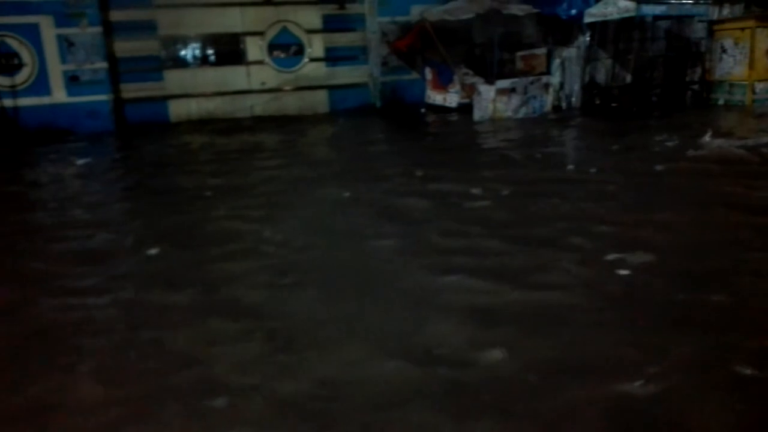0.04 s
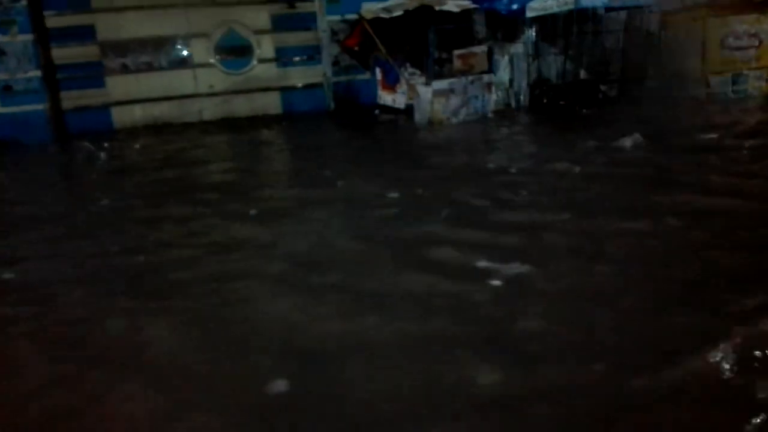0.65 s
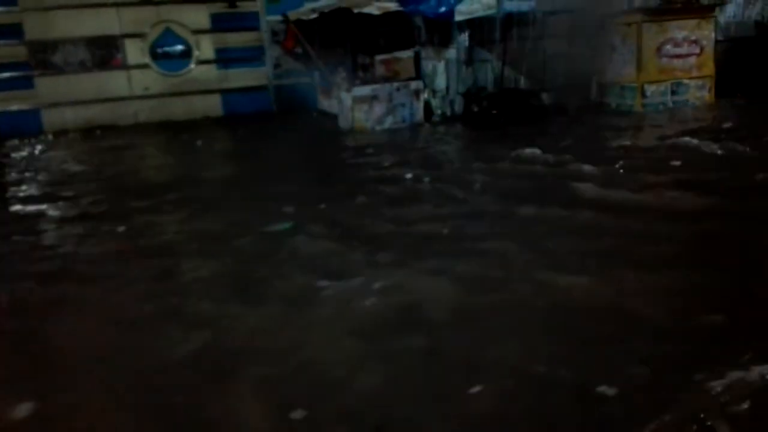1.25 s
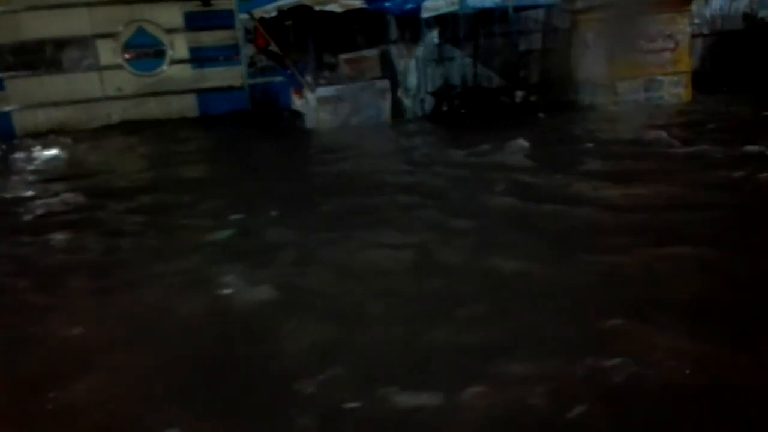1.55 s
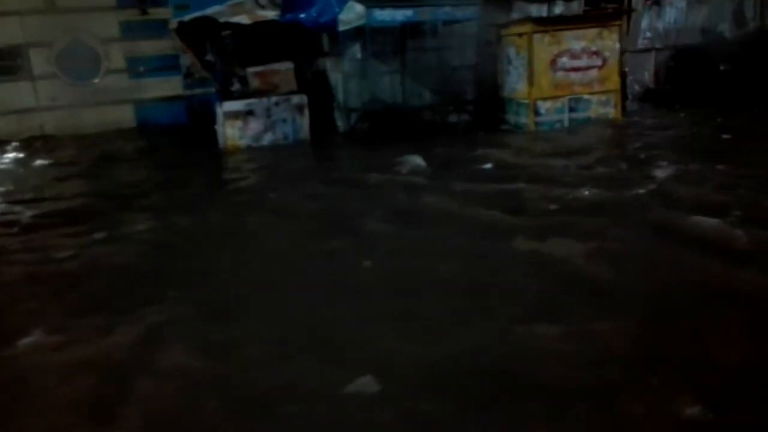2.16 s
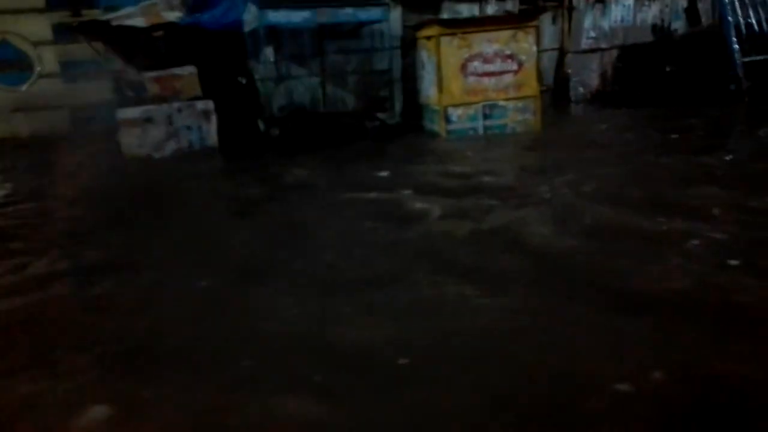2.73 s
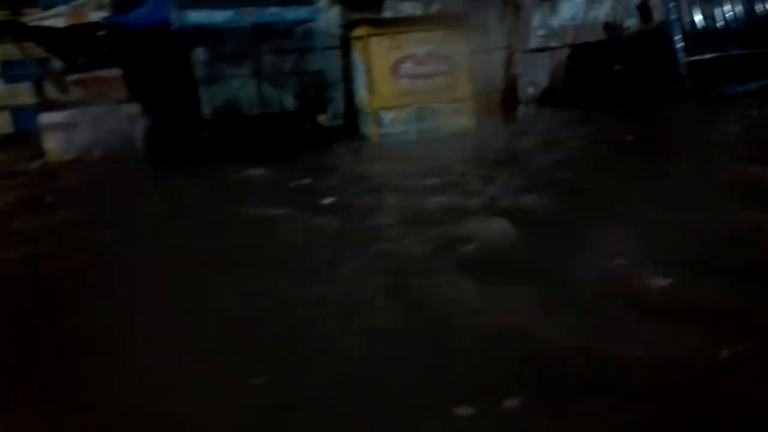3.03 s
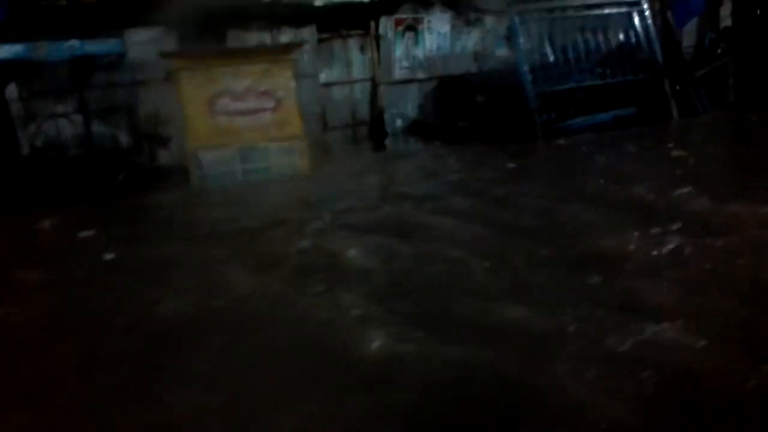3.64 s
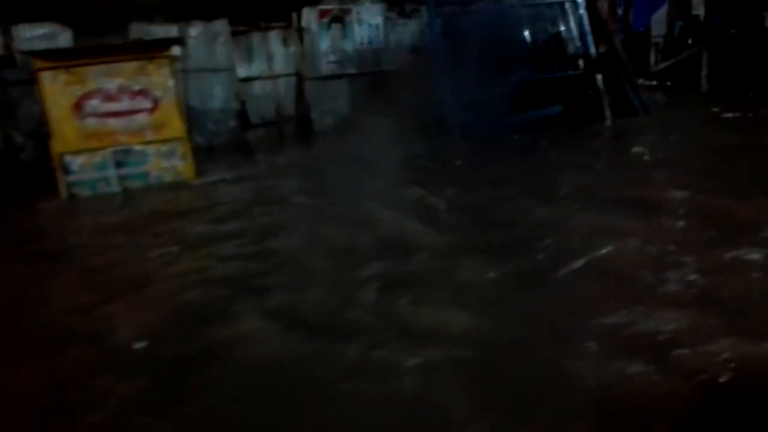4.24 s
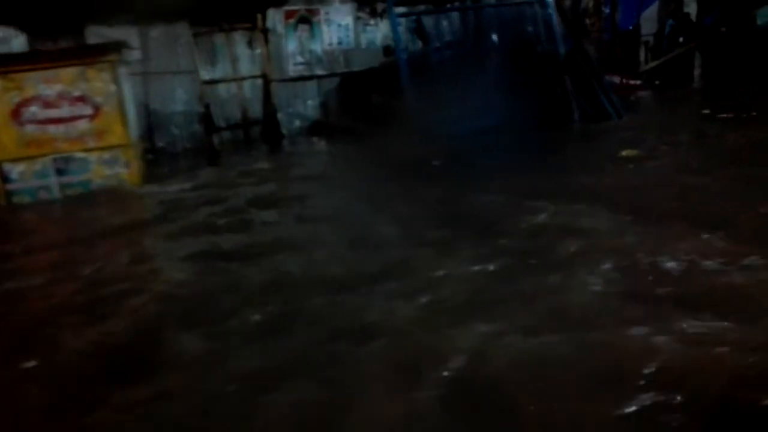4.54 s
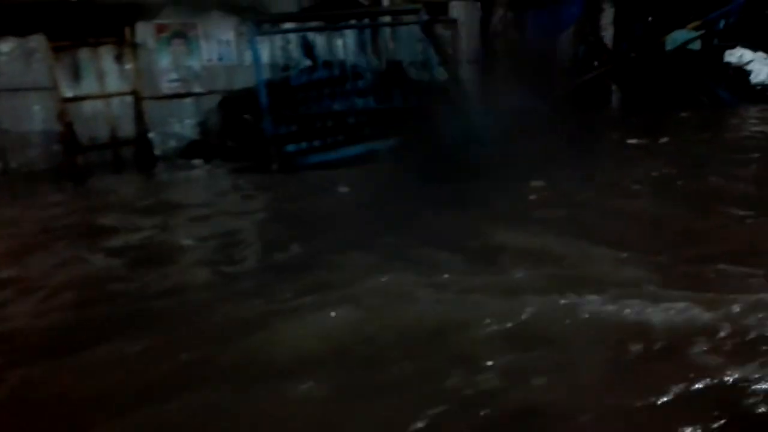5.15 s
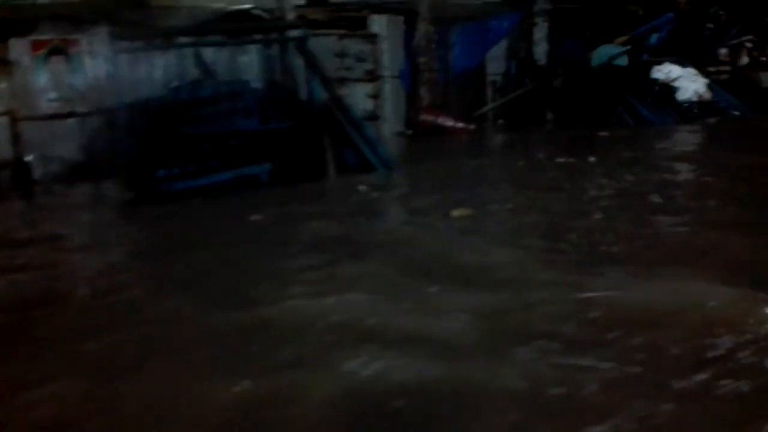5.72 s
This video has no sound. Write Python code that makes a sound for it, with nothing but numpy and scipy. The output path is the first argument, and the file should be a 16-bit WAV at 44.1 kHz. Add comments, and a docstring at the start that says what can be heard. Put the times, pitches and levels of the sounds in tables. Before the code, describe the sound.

Water swishes and splashes as a small vehicle wades through it, its engine chugging and a dry joint chirping.

```python
"""The engine of a small vehicle thuds about 32 times a second as it wades slowly through a flooded street.
Heard from on board, it runs over a low hum and is twice revved a little, with a thin metal whine.
Its shaking makes a dry joint chirp and a loose panel knock. The wave pushed up in front churns and
fizzes, with slaps of water, and trapped air rings as drips, a plop and a few deep glugs.
Very high up there are brief puffs of hiss, faint ticks and one short, broken squeal."""
import sys
import numpy as np
from scipy import signal
from scipy.fft import rfft, irfft
from scipy.io import wavfile
from scipy.ndimage import uniform_filter1d

SR = 44100
rng = np.random.default_rng(int(sys.argv[2]) if len(sys.argv) > 2 else 0)


def wav_out(sig):
    """Save sig, one row per channel (or a flat mono array), as 16-bit PCM at SR to the path in sys.argv[1]."""
    wavfile.write(sys.argv[1], SR, np.round(np.clip(np.atleast_2d(sig).T, -1, 1) * 32767).astype(np.int16))


N = 254898
TIME = np.arange(N) / SR

# how fast the engine fires: (time [s], rate [firings per second])
FIRING_RATE = [(0.0, 34), (0.18, 31.5), (0.5, 31), (1.05, 31), (1.3, 32.5), (1.42, 32.5), (1.7, 35.5),
               (2.0, 35), (2.2, 35.5), (2.5, 33), (2.85, 32.5), (3.35, 31.5), (3.6, 32), (4.0, 31),
               (4.4, 31), (4.7, 32), (4.83, 32.5), (4.97, 34), (5.08, 33.5), (5.27, 35.5), (5.5, 32),
               (5.78, 31.5)]
# how strong the thud is: (time [s], relative level [dB])
THUD_LEVELS = [(0.0, -24), (0.03, -23.5), (0.14, -17), (0.2, -14), (0.245, -21), (0.29, -14.5), (0.4, -16),
               (0.55, -18.5), (0.85, -15.5), (0.98, -16.5), (1.05, -19.5), (1.6, -19), (1.67, -15),
               (1.82, -19), (2.24, -18.5), (2.41, -23), (2.7, -17.5), (2.8, -19.5), (3.1, -17.5),
               (3.41, -17), (3.6, -19.5), (3.77, -16), (3.85, -18), (4.02, -14.5), (4.12, -18), (4.35, -19),
               (4.51, -17.5), (4.58, -17.5), (5.2, -17), (5.39, -19), (5.59, -17), (5.78, -18.5)]
# the higher tones of the thud: (multiple of the firing rate, relative level [dB])
OVERTONES = [(2, -18.5), (3, -20), (4, -28.5), (5, -25.5), (6, -28.5), (7, -29.5), (8, -29), (9, -38),
             (10, -34.5)]
# under the floor: (time [s], relative level of body shaking [dB], of churning water [dB])
UNDERSIDE_LEVELS = [(0.0, -29.5, -36.5), (0.87, -32, -36), (1.12, -30.5, -38.5), (1.95, -30.5, -36.5),
                    (2.35, -30, -40), (2.7, -30, -40), (3.11, -31.5, -35.5), (3.7, -31, -38.5),
                    (4.4, -33.5, -42), (4.7, -29, -35.5), (5.15, -31, -36.5), (5.45, -31.5, -37.5),
                    (5.62, -28, -32), (5.78, -30.5, -36)]
# tone colour of the shaking body: (frequency [Hz], relative level [dB])
RUMBLE_SPECTRUM = [(12, -23), (19.5, 0), (30, 10), (45, -5), (53, 3.5), (65, -1.5), (84, -3.5), (100, -5),
                   (125, -9.5), (180, -16), (400, -63)]
# two low hums: (upper pitch [Hz], lower pitch [Hz])
HUM_PITCHES = [121.45, 84.7]
# how strong they are: (time [s], upper level [dB], lower level [dB])
HUM_LEVELS = [(0, -36.5, -37.5), (1.5, -37, -38.5), (1.8, -39.5, -37), (2.1, -36, -35), (2.5, -37.5, -39.5),
              (3.2, -41, -42), (4.1, -41, -55), (4.4, -47, -46), (5.78, -42, -47)]
# how the whine swells: (time [s], relative level [dB])
WHINE_LEVELS = [(0.0, -12), (1.44, -14), (1.5, -3), (1.75, -3.5), (1.95, 0), (2.25, 0), (2.6, -1.5),
                (2.7, -4.5), (3.1, -7), (3.5, -11), (4.2, -9), (5.0, -6), (5.3, -4), (5.78, -10)]
# its raspy overtones: (pitch [Hz], width [Hz], relative level [dB], swell factor, flutter depth)
WHINE_BANDS = [(7570, 360, -64.5, 1.05, 0.6), (11360, 280, -72.5, 1.6, 0.7)]
# the wave in front: (time [s], relative level of slosh [dB], of spray [dB], of fizz [dB])
WAVE_LEVELS = [(0.0, -43.5, -49, -61.5), (0.39, -44, -49, -63.5), (0.76, -45, -49.5, -62.5),
               (1.0, -45, -51.5, -63), (1.14, -48, -50.5, -64), (1.3, -43, -50, -59.5),
               (1.48, -46, -50.5, -61), (1.7, -45.5, -49, -58.5), (2.11, -46.5, -49.5, -58.5),
               (2.35, -45, -48.5, -61), (2.77, -47.5, -51, -61), (3.57, -43.5, -48.5, -61.5),
               (3.93, -45.5, -49.5, -60.5), (4.47, -43, -48.5, -60), (5.01, -44, -47.5, -58.5),
               (5.54, -43, -48.5, -58), (5.78, -42.5, -47.5, -61.5)]
# tone colours of the wave's four layers, low to high: (frequency [Hz], relative level [dB])
CHURN_SPECTRUM = [(70, -18), (140, -4), (205, 3), (260, -4), (320, -7), (370, -13), (550, -29.5),
                  (1200, -60)]
SLOSH_SPECTRUM = [(200, -6), (380, 2.5), (500, 2.5), (620, 1), (800, 0), (1000, -5), (1250, -2),
                  (1540, -2.5), (1850, -8), (2600, -9.5), (5000, -75)]
SPRAY_SPECTRUM = [(900, -2.5), (1800, 3.5), (2300, -2), (3200, 2.5), (3900, -4), (4500, -6.5), (5000, -9),
                  (6500, -17), (9000, -25.5)]
FIZZ_SPECTRUM = [(3000, -6.5), (5800, 7), (7000, 3.5), (8200, 2.5), (9500, -0.5), (11000, -2.5),
                 (12500, -14), (14500, -21)]
# clear chirps of the joint: (time [s], level [dB], brightness [dB])
LOUD_CHIRPS = [(0.109, -41.5, -12), (0.146, -41, -6), (0.238, -40.5, -9), (0.272, -43, -10),
               (0.371, -49, -22), (0.397, -44, -10), (0.401, -40.5, -10), (0.463, -42.5, -12),
               (0.5913, -40.5, -4), (0.624, -50, -16), (0.685, -46, -13), (0.720, -53, -11),
               (0.809, -44, -6), (0.853, -46.5, -1.5), (1.299, -45, -10), (1.355, -47, -14),
               (1.478, -48, -10), (1.514, -43, -5), (1.690, -41.5, -8), (1.777, -44, -13), (1.834, -49, -4),
               (2.090, -44, -10), (2.549, -38.5, -11), (2.912, -40.5, -9), (3.22, -42, -7),
               (3.255, -43, -9), (3.319, -48, -18), (3.536, -44.5, -15), (4.176, -43.5, -13),
               (4.237, -47.5, -16), (4.271, -46.5, -8), (4.332, -44, -10), (4.427, -48, -16),
               (4.460, -40, -8), (4.527, -46, -8), (4.619, -38.5, -12), (4.654, -47, -1), (4.712, -44, -13),
               (4.747, -44.5, -3), (4.809, -48, -15), (4.840, -38, -9), (4.904, -44, -10), (4.937, -41, -9),
               (4.962, -43, -2), (4.995, -39.5, -10), (5.028, -42, -13), (5.062, -43, -7),
               (5.085, -47, -13), (5.116, -39.5, -9), (5.152, -42, -11), (5.178, -43, -6),
               (5.201, -44, -14), (5.587, -43, -5), (5.620, -44.5, -13), (5.681, -43, -8),
               (5.713, -45.5, -11), (5.745, -44.5, -5)]
# spells of softer chirping: (start [s], end [s], level [dB])
CHIRP_SPELLS = [(.2, .76, -57), (1.25, 1.85, -53), (2.3, 2.56, -53.5), (2.9, 3.0, -48), (3.2, 3.56, -54),
                (4.2, 5.22, -56), (5.45, 5.8, -50.5)]
# where the joint rings: (pitch [Hz], width [Hz], relative level [dB])
JOINT_BANDS = [(4510, 490, 4), (6030, 190, 2), (6900, 86, 1), (8090, 960, 1.5), (9150, 770, -8),
               (10040, 820, -4), (12200, 1800, -3.5)]
# slaps of water: (time [s], level [dB], pitch [Hz], pitch spread [octaves], length [s])
WATER_SLAPS = [(0.188, -39.5, 590, 1.4, 0.11), (0.2, -45.5, 2900, 0.62, 0.037),
               (0.255, -42.5, 1510, 0.16, 0.034), (0.301, -41, 2500, 1.3, 0.0088),
               (0.619, -45, 1236, 0.023, 0.11), (0.76, -43.5, 1340, 0.31, 0.085),
               (0.814, -39, 1410, 0.11, 0.018), (0.855, -43, 1420, 0.25, 0.032),
               (1.617, -47, 2270, 0.61, 0.16), (2.247, -39.5, 594, 0.11, 0.026),
               (3.572, -43, 1500, 0.093, 0.072), (3.577, -41, 720, 0.85, 0.046),
               (3.708, -44.5, 587, 0.12, .03), (4.132, -45, 2270, 0.099, 0.034),
               (4.242, -44, 422, 0.42, 0.2), (4.651, -35, 1060, 0.92, 0.03),
               (4.681, -45.5, 400, 0.35, 0.16), (5.217, -34.5, 1640, 0.87, 0.031),
               (5.565, -35, 1490, 0.11, 0.02), (5.676, -40, 1010, 0.76, 0.038),
               (5.721, -38, 1440, 0.16, 0.011)]
# brief puffs of high hiss: (time [s], level [dB])
HISS_PUFFS = [(0.218, -59), (1.24, -59), (1.925, -59), (2.27, -52.5), (2.777, -55), (3.05, -58),
              (5.335, -55)]
# large air pockets: (time [s], peak level [dB], pitch [Hz], time to fade by 60 dB [s])
AIR_POCKETS = [(0.295, -20, 222, 0.064), (5.045, -21, 214, 0.095), (5.294, -16.5, 275, 0.069),
               (5.339, -23.5, 305, 0.13), (5.414, -27.5, 289, 0.11)]
# single falling drops: (time [s], relative level [dB], pitch [Hz])
DROPS = [(0.395, -38, 2930), (1.149, -42, 2400), (1.777, -38, 2370), (1.835, -39, 2370), (2.274, -39, 2250),
         (2.281, -39, 2960), (3.219, -39, 3020), (3.256, -38, 2960), (3.377, -39, 2190), (4.064, -40, 3240),
         (4.294, -40, 973), (4.372, -36, 1490), (4.753, -36, 2900)]
# one small air pocket: (time [s], level [dB], pitch [Hz], half length [s])
SMALL_POCKET = (0.8168, -28.5, 1390, 0.0028)
# knocks of the panel: (time [s], relative level [dB], treble lift [dB per octave])
PANEL_KNOCKS = [(2.4295, -31, 2.5), (2.4889, -22.5, 3), (2.588, -28.5, 1), (3.0046, -26.5, 0),
                (3.1544, -34, -2), (3.5678, -26, 1), (3.677, -26, 0), (3.7268, -23.5, -1.5),
                (3.7704, -29.5, 2)]
# the panel's own tones: (pitch [Hz], relative level [dB], time to fade by 60 dB [s])
PANEL_TONES = [(1490, -2.5, 0.024), (1770, -8.5, 0.011), (2360, -1, 0.011), (2910, 3.5, 0.0093),
               (3500, -11, 0.008), (3840, -3, 0.013), (4120, -7.5, 0.012)]
# strokes of the squeal: (time [s], length [s], start pitch [Hz], end pitch [Hz], level [dB])
SQUEAL_STROKES = [(4.15, 0.045, 8450, 8900, -63.5), (4.195, 0.035, 8950, 9350, -67),
                  (4.232, 0.047, 9500, 10250, -62), (4.303, 0.045, 10800, 10980, -62.5),
                  (4.35, 0.044, 11020, 11250, -65.5), (4.4, 0.035, 11600, 11600, -67),
                  (4.435, 0.05, 11500, 10800, -70)]


def amp(db):
    """Turns decibels into a number to multiply by."""
    return 10 ** (np.asarray(db) / 20)


def unit(x):
    """Scales a signal to an average strength (rms) of 1."""
    return x / np.sqrt(np.mean(x ** 2) + 1e-20)


def curve(rows):
    """Joins a table's points with straight lines: one curve for each column after the time."""
    times, *columns = np.transpose(rows)
    return [np.interp(TIME, times, column) for column in columns]


def colour(x, spectrum):
    """Gives a sound the tone colour in a table, at strength 1."""
    hz, db = np.transpose(spectrum)
    freqs = np.fft.rfftfreq(len(x), 1 / SR)
    gain = amp(np.interp(np.log(freqs + 1), np.log(hz), db))
    return unit(irfft(rfft(x) * gain, len(x)))


def band(size, hz, width):
    """Noise gathered around one pitch, at strength 1."""
    freqs = np.fft.rfftfreq(size, 1 / SR)
    return unit(irfft(rfft(rng.standard_normal(size)) / (1 + ((freqs - hz) / width) ** 2) ** 2, size))


def drift(rate_hz):
    """A curve of strength 1 that wanders to a new random value rate_hz times a second."""
    knots = rng.standard_normal(4096)
    return unit(np.interp(TIME * rate_hz, np.arange(len(knots)), knots))


def sine(hz):
    """A pure tone that follows a changing pitch."""
    return np.sin(2 * np.pi * np.cumsum(hz) / SR)


def clicks(size, chance):
    """Random clicks; each sample has the given chance of holding one."""
    return rng.standard_normal(size) * (rng.random(size) < chance)


def pulsing(firings, depth):
    """One smooth swell for each firing of the engine, at strength 1."""
    return unit(np.exp(depth * np.cos(2 * np.pi * firings)))


def add(mix, start, sound):
    """Mixes a sound in at a start time in seconds."""
    part = mix[max(round(start * SR), 0):][:len(sound)]
    part += sound[:len(part)]


def engine(firings):
    """Each firing makes a thud; its overtones and a low rumble grow as the body shakes harder."""
    thud_db, = curve(THUD_LEVELS)
    shake_db, _ = curve(UNDERSIDE_LEVELS)
    overtones = 0
    for multiple, db in OVERTONES:
        level = amp(db + 2 * drift(3.695))
        cycles = multiple * firings + rng.random() + 0.1 * drift(4)  # wavers against the thud
        overtones += level * np.cos(2 * np.pi * cycles)
    thud = amp(thud_db + 3.5 + 0.53 * drift(21)) * np.cos(2 * np.pi * firings)
    rumble = colour(rng.standard_normal(N), RUMBLE_SPECTRUM)
    return thud + amp(shake_db) * (amp(14) * overtones + amp(4) * rumble)


def hum():
    """Two low hums throb against the engine's overtones and grow quieter later on."""
    out = np.zeros(N)
    for hz, db in zip(HUM_PITCHES, curve(HUM_LEVELS)):
        level = amp(db + 2.2 * drift(7.4))
        out += level * np.sqrt(2) * sine(hz + drift(2.96))
    return out


def whine(firings, pitch_hz=2526):
    """A thin metal tone with raspy overtones flutters with the firings and swells with the revving."""
    swell_db, = curve(WHINE_LEVELS)
    tone = np.sqrt(2) * sine(pitch_hz * (1 + 0.012 * drift(200)))
    out = amp(-56 + swell_db) * tone * pulsing(firings, depth=0.85)
    for hz, width, db, follow, depth in WHINE_BANDS:
        rasp = amp(db + follow * swell_db) * band(N, hz, width)
        out += rasp * pulsing(firings + 0.09 * drift(28), depth)
    return out


def water_noise(patch_db, flicker_db):
    """A rushing noise that swells in small patches of time and pitch, and flickers as a whole."""
    grid = signal.stft(rng.standard_normal(N), nperseg=512, noverlap=384)[2].T  # time by pitch
    patches = uniform_filter1d(rng.standard_normal(grid.shape), size=12, axis=0)
    patches = unit(uniform_filter1d(patches, size=5, axis=1))
    flicker = unit(uniform_filter1d(rng.standard_normal(len(grid)), size=5))[:, None]
    grid *= amp(patch_db * patches + flicker_db * flicker)
    return unit(signal.istft(grid.T, nperseg=512, noverlap=384)[1][:N])


def bubbles(per_s, low_hz, high_hz, cycles, spread_db, sizes=32):
    """A swarm of bubbles of many sizes; each rings briefly and rises in pitch as it comes up."""
    born = rng.random(N) < per_s / SR
    size = rng.integers(0, sizes, N)
    strength = amp(spread_db * np.minimum(rng.exponential(1, N), 4))
    pops = born * strength * rng.choice([-1, 1], N)
    out = np.zeros(N)
    for k, hz in enumerate(np.linspace(low_hz, high_hz, sizes)):
        age = np.arange(0, 5, hz / cycles / SR)
        fade = np.exp(-age) * (1 - np.exp(-10 * age))
        ring = fade * np.sin(2 * np.pi * cycles * (age + 0.011 * age ** 2))
        out += signal.oaconvolve(pops * (size == k), ring * np.sqrt(hz))[:N]
    return unit(out)


def bow_wave(firings, laps_per_s=14):
    """Water churns under the floor, sloshes at the sides and sprays; the engine makes it pulse a bit."""
    _, churn_db = curve(UNDERSIDE_LEVELS)
    slosh_db, spray_db, fizz_db = curve(WAVE_LEVELS)
    churn = colour(water_noise(0.89, 0.092), CHURN_SPECTRUM)
    churn *= amp(churn_db - 1 + 2.04 * drift(laps_per_s)) * pulsing(firings, depth=0.16)
    slosh = water_noise(0.9, 0.34) + amp(-13) * bubbles(600, 390.3, 2423, cycles=10.8, spread_db=2.1)
    panel_ring = amp(-16) * band(N, hz=1510, width=21)  # sloshing keeps the panel's lowest tone going
    slosh = amp(slosh_db) * (colour(slosh, SLOSH_SPECTRUM) + panel_ring)
    spray = water_noise(0.4, 1.0) + amp(-15) * bubbles(1500, 1720, 7020, cycles=3.9, spread_db=5.3)
    spray = amp(spray_db + 1) * colour(spray, SPRAY_SPECTRUM)
    fizz = water_noise(2.2, 2.2)
    fizz += amp(-23) * bubbles(550, 6600, 13300, cycles=5.7, spread_db=1.7, sizes=12)
    fizz = amp(fizz_db + 0.5) * colour(fizz, FIZZ_SPECTRUM)
    flung = (spray + fizz) * pulsing(firings, depth=0.081)
    lapping = amp(0.79 * drift(laps_per_s))
    return churn + lapping * (slosh + flung)


def soft_chirps(firings, resting_db=-72):
    """Lists the joint's small slips, one for each shake, as (time [s], level [dB], brightness [dB])."""
    loud_times = np.transpose(LOUD_CHIRPS)[0]
    lag = np.unwrap(np.interp(loud_times, TIME, firings), period=1)  # keeps step with the loud chirps
    shake_count = np.floor(firings - np.interp(TIME, loud_times, lag))
    chirps = []
    for time in TIME[np.flatnonzero(np.diff(shake_count))]:
        level_db = max([resting_db] + [db for start, end, db in CHIRP_SPELLS if start <= time < end])
        force, grit = rng.standard_normal(2)
        if abs(loud_times - time).min() > 0.018:  # leave room for the loud ones
            chirps.append((time, level_db + 1.5 * force, -15 + 12 * grit))
    return chirps


def joint(firings, pitch_hz=5475, fall_hz_per_s=30000, slip_s=0.0025, snap_s=0.0018):
    """A dry joint slips for a moment on each shake: a falling chirp with a scrape at its height."""
    out, t = np.zeros(N), TIME[:1024]
    since_peak = t - 0.0026
    tail = amp(-26) * np.exp(-t / 0.005)
    slip = np.exp(-(since_peak / slip_s) ** 2) + tail
    snap = np.exp(-(since_peak / snap_s) ** 2) + tail
    fall_hz = fall_hz_per_s * np.minimum(since_peak, slip_s)
    for start, db, bright_db in list(LOUD_CHIRPS) + soft_chirps(firings):
        tone = sine(pitch_hz * (1 + 0.008 * rng.standard_normal()) - fall_hz)
        scrape = unit(sum(amp(band_db) * band(len(t), hz, width) for hz, width, band_db in JOINT_BANDS))
        add(out, start, amp(db) * (slip * tone + amp(bright_db + 2) * snap * scrape))
    return out


def slaps(pops_per_s=2500):
    """Small waves break on the body: a quick rise, then a dying cloud of bubbles of similar size."""
    out, t = np.zeros(N), TIME[:16384]
    freqs = np.fft.rfftfreq(len(t), 1 / SR)
    for start, db, hz, spread, length in WATER_SLAPS:
        age = t / length
        octaves = np.log2((freqs + 1) / hz)
        spectrum = np.exp(-0.5 * (octaves / spread) ** 2 - 0.5 * np.maximum(octaves, -2))
        pops = clicks(len(t), pops_per_s / SR)
        swell = (1 - np.exp(-20 * age)) * np.exp(-age ** 2)
        cloud = swell * irfft(rfft(pops) * spectrum, len(t))
        add(out, start, amp(db) * cloud * np.linalg.norm(swell) / (np.linalg.norm(cloud) + 1e-12))
    return out


def hiss_puffs(length_s=0.025, clicks_per_s=3000):
    """Brief puffs of high hiss stand out from the fizz."""
    out, t = np.zeros(N), TIME[:4096]
    swell = np.sin(np.pi * np.minimum(t / length_s, 1))
    for start, db in HISS_PUFFS:
        hiss = colour(clicks(len(t), clicks_per_s / SR), FIZZ_SPECTRUM)
        add(out, start, amp(db) * swell * hiss)
    return out


def high_ticks(every_s=0.3413):
    """A very faint, very high tick comes about three times a second, now stronger, now weaker."""
    out, t = np.zeros(N), TIME[:4096]
    swell = np.exp(-((t - 0.016) / 0.032) ** 2)
    for start in np.arange(0.218, TIME[-1], every_s):
        level = amp(-70 + 3 * rng.standard_normal())
        add(out, start, level * swell * band(len(t), hz=13100, width=1700))
    return out


def glugs():
    """Trapped air rings low under the floor and climbs a little in pitch."""
    out, t = np.zeros(N), TIME[:SR // 4]
    onset = 1 - np.exp(-(t / 0.0049) ** 2)
    for start, db, hz, fade_s in AIR_POCKETS:
        ring = np.sin(2 * np.pi * hz * (t + 0.78 * t ** 2)) * onset * amp(-60 * t / fade_s)
        add(out, start, amp(db) * ring / abs(ring).max())
    return out


def drips(cycles=13, rise=0.0071):
    """Single drops fall back and trap one bubble each, which rings and climbs a little in pitch."""
    out, t = np.zeros(N), TIME[:4096]
    for start, db, hz in DROPS:
        age = t * hz / cycles  # higher bubbles die away sooner
        fade = np.exp(-age) * (1 - np.exp(-8 * age))
        ring = fade * np.sin(2 * np.pi * cycles * (age + rise * age ** 2 / 2))
        add(out, start, amp(db - 1.5) * ring / abs(ring).max())
    return out


def plop():
    """One small air pocket swells and is pinched off within a few vibrations."""
    time, db, hz, half_length = SMALL_POCKET
    since_peak = TIME - time
    return amp(db) * np.exp(-(since_peak / half_length) ** 2) * np.sin(2 * np.pi * hz * since_peak)


def panel():
    """Each knock rings all the loose panel's tones at once; a harder contact favours the high ones."""
    out, t = np.zeros(N), TIME[:2048]
    strike = (1 - np.exp(-t / 0.00012)) * (1 + np.exp(-t / 0.00077))
    for start, db, lift_db in PANEL_KNOCKS:
        ring = np.zeros(len(t))
        for hz, tone_db, fade_s in PANEL_TONES:
            octaves_up = np.log2(hz / PANEL_TONES[0][0])
            level = amp(tone_db + lift_db * octaves_up - 60 * t / fade_s)
            ring += strike * level * np.sin(2 * np.pi * (hz * t + rng.random()))
        add(out, start + 0.0005, amp(db + 1.5) * ring / abs(ring).max())
    return out


def squeal(rasp_depth=0.009, rasp_per_s=1500):
    """A faint, very high, scratchy squeal climbs in short broken strokes and dips on the last."""
    out, t = np.zeros(N), TIME[:4096]
    for start, length, from_hz, to_hz, db in SQUEAL_STROKES:
        progress = np.minimum(t / length, 1)
        rasp = np.interp(progress * length * rasp_per_s, np.arange(512), rng.standard_normal(512))
        hz = (from_hz + (to_hz - from_hz) * progress) * (1 + rasp_depth * rasp)
        swell = np.sqrt(4 * progress * (1 - progress))
        add(out, start, amp(db) * swell * sine(hz))
    return out


def cabin(x, echo_db, fade_s):
    """Adds short echoes from the roof and sides."""
    t = TIME[:SR // 5]
    echoes = clicks(len(t), chance=0.05) * (t > 0.002) * amp(-60 * t / fade_s)
    return x + amp(echo_db) * signal.oaconvolve(x, echoes / np.linalg.norm(echoes))[:N]


def scene():
    """Mixes the engine, the water, the faint high sounds and the rattles into one channel."""
    rate, = curve(FIRING_RATE)
    firings = np.cumsum(rate * (1 + 0.0039 * drift(30))) / SR  # counts up by one for each firing
    shakes = firings - 0.6  # loose parts lag behind the firing
    motor = engine(firings) + hum() + whine(shakes)
    water = bow_wave(shakes) + glugs()
    water += cabin(slaps() + drips() + plop(), echo_db=-9.5, fade_s=0.07)
    treble = hiss_puffs() + squeal() + high_ticks()
    knocks = cabin(panel(), echo_db=-7, fade_s=0.033)
    chirps = cabin(joint(shakes), echo_db=-9, fade_s=0.042)
    return (motor + water + treble + knocks + chirps)[None]


def record(dry, cutoff_hz=14400):
    """Cuts away the very highest treble."""
    low_pass = signal.firwin(511, cutoff_hz, window=("kaiser", 9), fs=SR)
    return signal.oaconvolve(dry, low_pass[None], "same")


dry = scene()
out = record(dry)
wav_out(out)
```